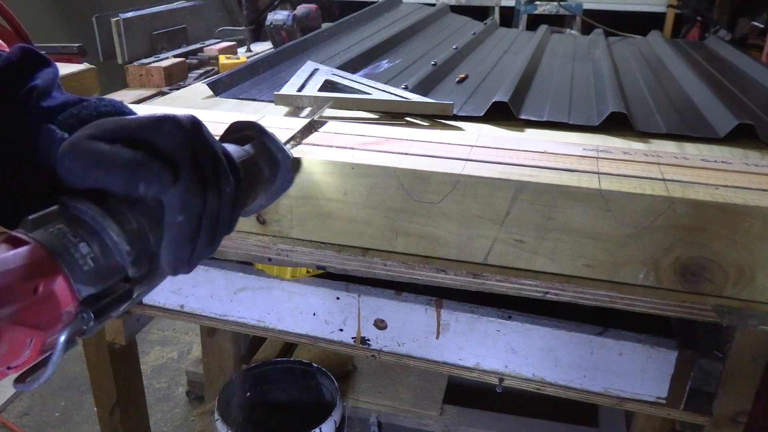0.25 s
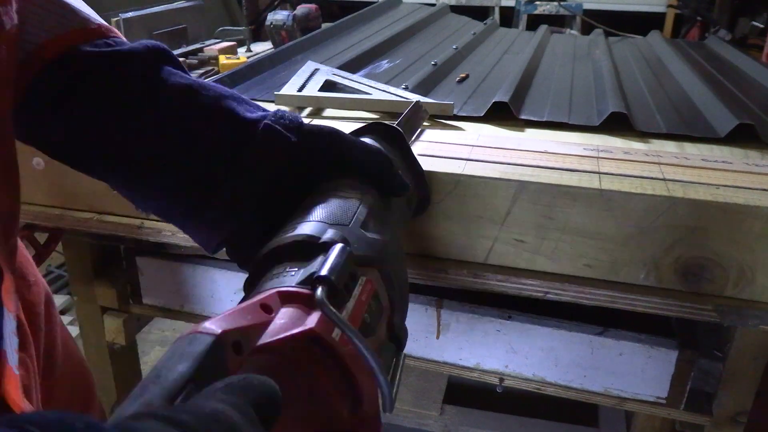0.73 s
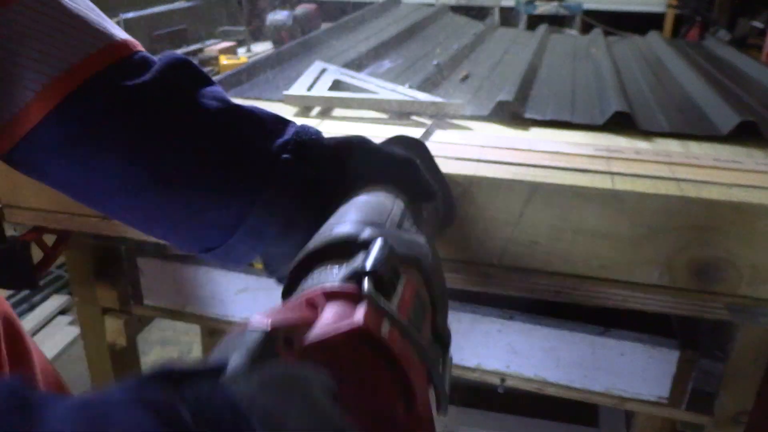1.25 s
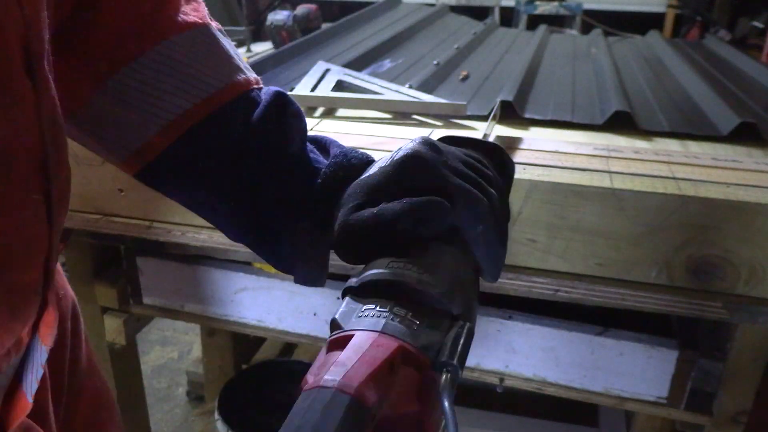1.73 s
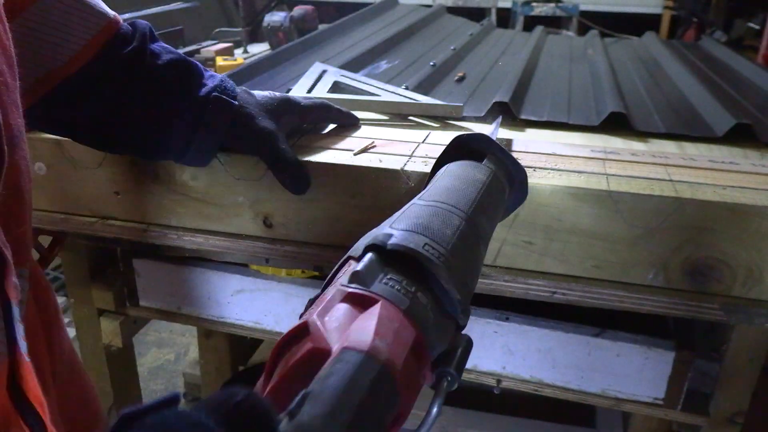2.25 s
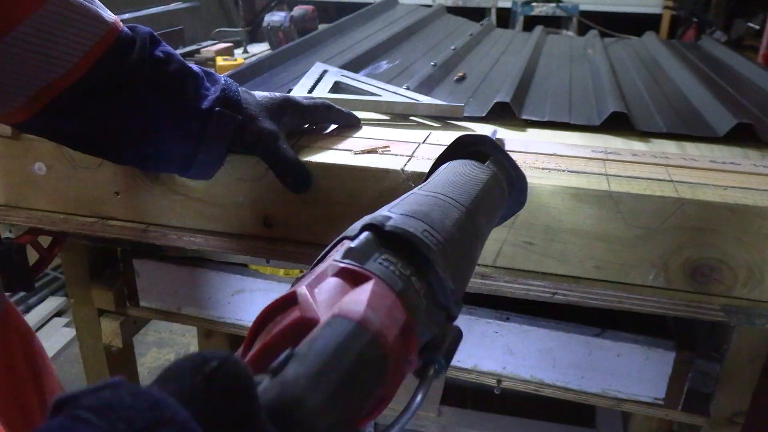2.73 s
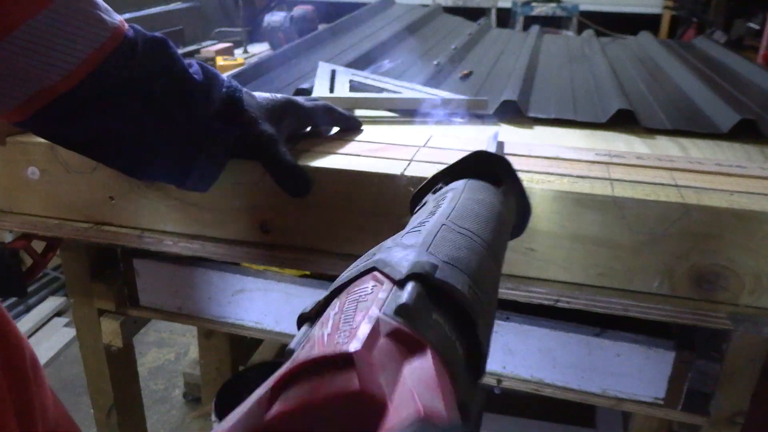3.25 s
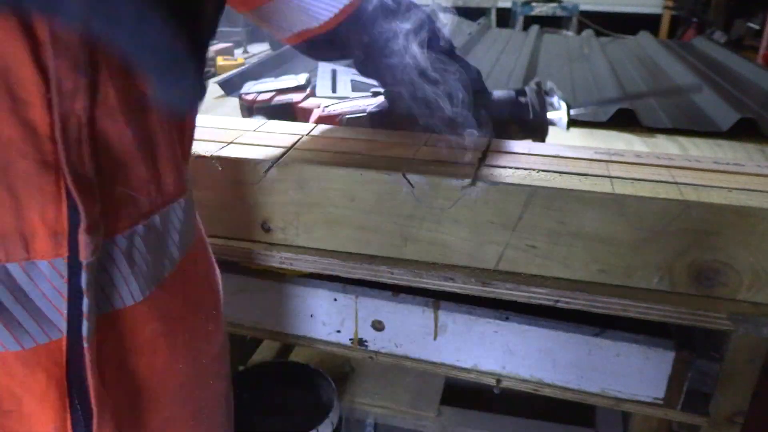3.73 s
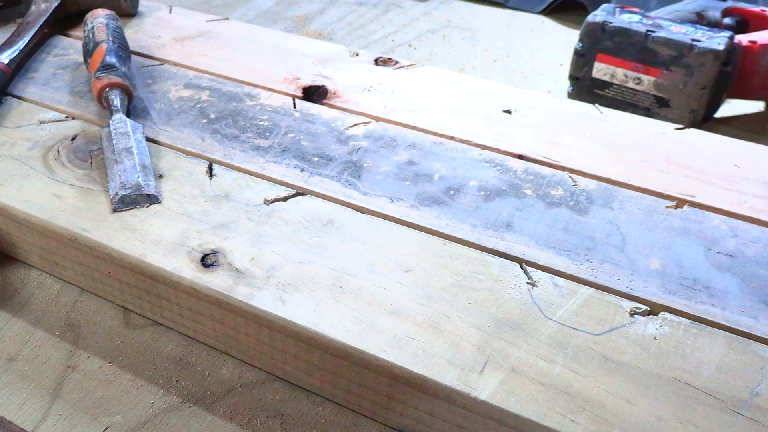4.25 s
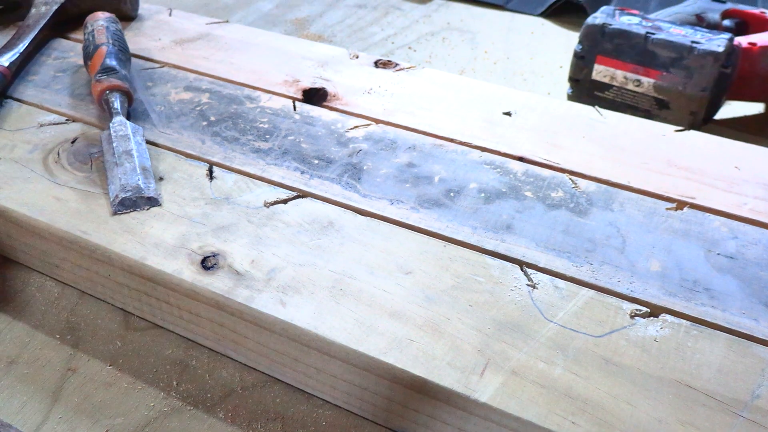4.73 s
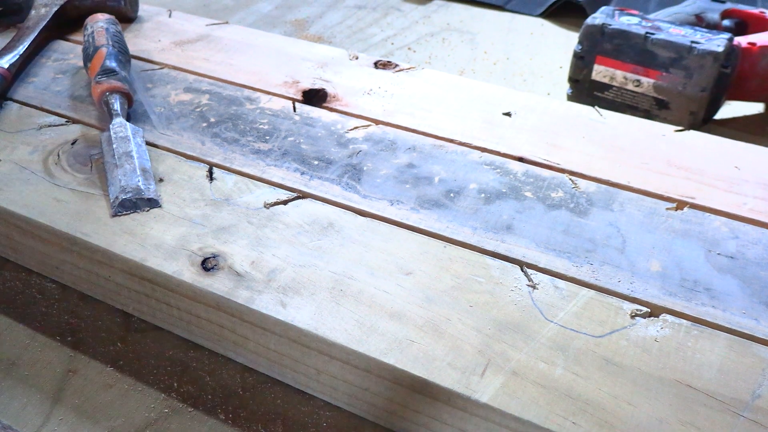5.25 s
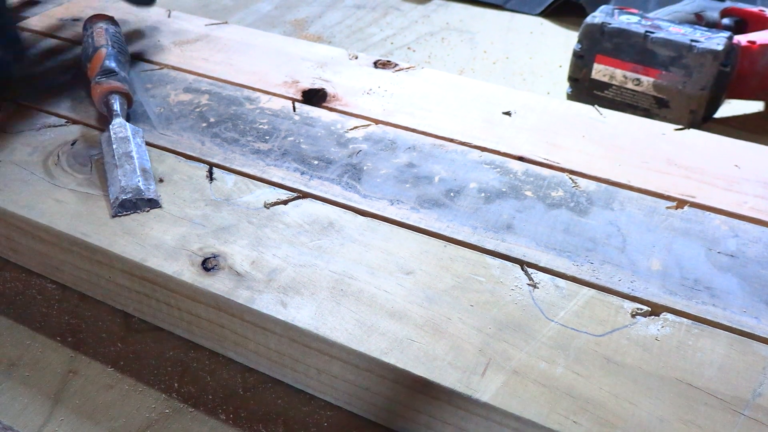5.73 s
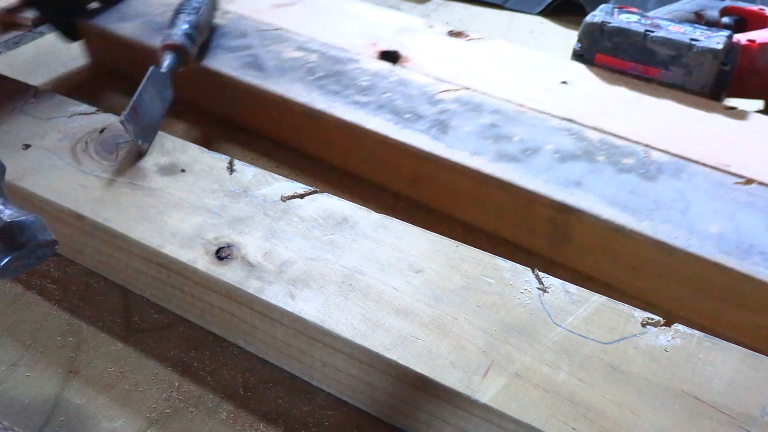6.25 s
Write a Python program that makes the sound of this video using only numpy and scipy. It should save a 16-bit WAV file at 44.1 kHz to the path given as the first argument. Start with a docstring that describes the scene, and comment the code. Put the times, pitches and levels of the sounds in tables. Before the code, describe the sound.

From 0 to 3.7 s a cordless saw works through thick timber, sped up roughly tenfold, so it is a bright, hissy, toothy buzz with a thin wavering whine. Longer pulls run about 0.1-0.6, 0.8-1.4, 2.25-2.8 and 2.9-3.7 s, sagging in pitch as the blade loads; very short zips chatter around 1.6-1.9 and 2.0-2.2. Narrow squeals colour the cut near 0.85-1.1 and 2.0, with a faint thump at 0.83. Dry taps fall at 1.5 and 1.9, and a loud double clack at 3.8. At 4.0 the speed turns natural: low, quiet air, faint rustles and tiny wooden bumps until 4.9. A gritty scrape with a small knock comes at 5.05-5.5, soft bumps around 5.7 and 6.0, then from 6.17 a rumbling timber drag with strong, dull wooden knocks at 6.18 and 6.4. Close, with a short workshop reverberation.

```python
"""First a cordless reciprocating saw cuts a timber beam, sped up about tenfold: pulses of toothy noise and
stroke hum, with a thin gear whine, narrow noisy squeals, decaying tool taps and one low thump.
The strokes sing at roughly 300-470 a second and the workshop rings briefly.
After a short silence, at natural speed, sleeves rustle and timber is dragged over the bench (grainy noise)
and knocked against it (short noisy contacts that ring the wood)."""
import sys
import numpy as np
from scipy import signal
from scipy.fft import rfft, irfft
from scipy.io import wavfile
from scipy.ndimage import uniform_filter1d

SR = 44100
rng = np.random.default_rng(int(sys.argv[2]) if len(sys.argv) > 2 else 0)


def output_pcm(signal):
    """Save a mono or channel-first signal as 16-bit PCM at the path in sys.argv[1].

    Samples are clipped to [-1, 1] before scaling.
    """
    pcm = np.clip(np.atleast_2d(signal).T, -1, 1) * 32767
    wavfile.write(sys.argv[1], SR, np.round(pcm).astype(np.int16))


N = 286650
T = np.arange(N) / SR
HZ = np.maximum(np.arange(N // 2 + 1) * SR / N, 1)
SPEED_CHANGE_S = 4.0
FREE_STROKES = 468  # strokes per second of the unloaded motor

# Pulls of the saw's trigger: (start [s], release [s], time to bite [s], rasp level [dB],
# stroke hum above rasp [dB], top hiss level at start [dB], top hiss level at release [dB])
PULLS = [(0.0, 0.077, 0.00055, -23.5, -9.5, -14.5, -24.5), (0.103, 0.588, 0.016, -24, -14.5, -17, -24.5),
         (0.626, 0.658, 0.0076, -35, -4.5, -14, -19), (0.819, 1.432, 0.0052, -21.5, -13.5, -18, -22),
         (1.604, 1.614, 0.0044, -26.5, -13, 0, -44), (1.644, 1.687, 0.0016, -17.5, -14.5, -11, -29),
         (1.735, 1.767, 0.0029, -18, -11.5, -17.5, -24), (1.824, 1.856, 0.0063, -17.5, -14.5, -8.5, -20.5),
         (1.999, 2.152, 0.0027, -20.5, -19, -16.5, -21.5), (2.184, 2.210, 0.016, -16, -10.5, 4, -29),
         (2.25, 2.833, 0.014, -25, -12, -20, -23.5), (2.876, 3.666, 0.0072, -22, -14.5, -19.5, -24.5),
         (3.68, 3.697, 0.0029, -23.5, -18.5, -10, -27)]
# Ways the timber rings: (frequency [Hz], level [dB], time to die by 60 dB [s])
TIMBER = [(200, -21, .09), (309.5, 0.5, 0.16), (505, -3.5, 0.35), (737, 3, 0.048), (906, 7.5, 0.039),
          (1182, 21.5, 0.011), (1357, 7, 0.043), (1850, 5.5, 0.032), (2850, -8, 0.016)]


def undb(db):
    """Turn decibels into gain."""
    return 10 ** (np.asarray(db) / 20)


def unit(x):
    """Scale a sound to an rms level of 1."""
    return x / np.sqrt(np.mean(x ** 2))


def colour(x, points):
    """Shape a sound's tone by (frequency [Hz], level [dB]) points."""
    hz, db = np.transpose(points)
    gain = undb(np.interp(np.log(HZ), np.log(hz), db))
    return irfft(rfft(x) * gain, N)


def band(x, low_hz, high_hz):
    """Keep the sound between two frequencies."""
    return signal.sosfilt(signal.butter(2, [low_hz, high_hz], "band", fs=SR, output="sos"), x)


def share(x, low_hz, high_hz):
    """Take a band without phase shift; neighbouring bands add up with no gap."""
    below_high = 1 / (1 + (HZ / high_hz) ** 4)
    below_low = 1 / (1 + (HZ / low_hz) ** 4)
    return irfft(rfft(x) * (below_high - below_low), N)


def ring(x, modes):
    """Let a push x set off a sum of dying tones, as in a struck solid."""
    out = 0
    for hz, db, t60 in modes:
        pole = np.exp(2j * np.pi * hz / SR - np.log(1000) / (t60 * SR))
        out = out + undb(db) * signal.lfilter([1], [1, -pole], x).imag
    return out


def walk(rate):
    """Wander at random: a new level every 1 / rate seconds, reached by a straight slide; rms 1."""
    k = int(SR / rate)
    steps = np.repeat(rng.standard_normal(N // k + 1), k)
    return unit(uniform_filter1d(steps, k)[:N])


def grit(scatter_db):
    """Make noise from grains of very uneven size, up to a largest one."""
    size_db = scatter_db * np.minimum(rng.exponential(1, N), 3)
    return unit(rng.standard_normal(N) * undb(size_db))


def room(x, t60_s, wet_db):
    """Add many blurred, dying reflections to the direct sound."""
    t = T[:int(SR * t60_s)]
    tail = rng.standard_normal(len(t)) * 1000 ** (-t / t60_s)
    return x + undb(wet_db) * signal.fftconvolve(x, tail / np.linalg.norm(tail))[:N]


def widen(mid, side_db):
    """Make two channels: short scattered reflections reach left and right with opposite sign."""
    scatter = rng.standard_normal(3000) * np.exp(-T[:3000] / .03)
    scattered = signal.fftconvolve(mid, scatter / np.linalg.norm(scatter))[:N]
    side = colour(scattered, side_db)
    return np.array([mid + side, mid - side])


def held(values):
    """Give the value of the latest trigger pull at every moment."""
    latest = np.searchsorted(np.array(PULLS)[:, 0], T) - 1
    return np.asarray(values)[np.maximum(latest, 0)]


def within(curves, column, rest):
    """Follow a column of the long cuts' curves, with a resting value outside them."""
    out = np.full(N, float(rest))
    for rows in map(np.array, curves):
        span = (T > rows[0, 0] - .02) & (T < rows[-1, 0] + .04)
        out[span] = np.interp(T[span], rows[:, 0], rows[:, column])
    return out


def motor():
    """Give trigger gain, strokes a second and evenness; the motor spins up, and its sound dies on release."""
    # The long cuts slow the motor; even strokes bring harmonics out of the rasp. One list a cut:
    # (time [s], stroke rate once spun up [per s], evenness [dB])
    stroke_curves = [
        [(.11, 450, -12), (.165, 410, -10), (.19, 446, 0), (.25, 446, 0), (.265, 422, -6), (.28, 432, -6),
         (.31, 390, -8), (.46, 363, -10), (.58, 385, -10)],
        [(.83, 470, -16), (.91, 465, -14), (.94, 446, -2), (.98, 432, -3), (1.02, 388, -7), (1.09, 397, -9),
         (1.16, 365, -5), (1.3, 306, -3), (1.33, 440, -16), (1.43, 466, -12)],
        [(2.0, 420, -14), (2.04, 420, -12), (2.055, 460, 2), (2.11, 448, 2), (2.135, 425, -10),
         (2.158, 460, -10)],
        [(2.27, 446, -10), (2.295, 464, -3), (2.35, 434, -4), (2.4, 467, -3), (2.45, 458, -4), (2.475, 432, -4),
         (2.51, 460, -4), (2.59, 456, -6), (2.71, 390, -4), (2.79, 380, -2), (2.83, 385, -4)],
        [(2.89, 396, -4), (2.94, 367, 1), (3.0, 350, -3), (3.1, 338, 0), (3.17, 321, 1), (3.21, 348, -2),
         (3.3, 336, -1), (3.5, 328, -1), (3.55, 342, -1), (3.575, 378, 0), (3.67, 370, -2)],
    ]
    spin_up_s, missing_share = .008, .3  # share of the speed missing at the start
    coast_s, free_evenness_db = .005, -13
    start, end, bite = map(held, np.transpose(PULLS)[:3])
    since = np.maximum(T - start, 0)
    attack = np.minimum(since / np.maximum(bite, 1 / SR), 1) ** 2
    on = attack * np.exp(-np.maximum(T - end, 0) / coast_s)
    spin_up = 1 - missing_share * np.exp(-since / spin_up_s)
    rate = within(stroke_curves, column=1, rest=FREE_STROKES) * spin_up
    return on, rate, within(stroke_curves, column=2, rest=free_evenness_db)


def saw():
    """Teeth rasp once a stroke; the crank hums on the stroke harmonics; both ring the tool body."""
    # Tone of the teeth: (frequency [Hz], level [dB])
    rasp_tone = [(60, -31), (600, -30), (850, -14.5), (1400, -6), (2600, -1), (5000, 1.5), (7000, 2.5),
                 (10000, 1.5), (15400, 2.5), (16500, -39.5)]
    # Tone of the crank: (frequency [Hz], level [dB])
    crank_tone = [(700, -30), (900, -4), (1050, 2), (1400, 1), (1850, 0), (2300, -1), (2700, 0), (3700, 0),
                  (4800, -12)]
    # Resonances of the tool body: (frequency [Hz], width [Hz], lift [dB])
    body = [(900, 250, 3), (1830, 250, 4), (2710, 250, 4), (3650, 350, 3), (4960, 300, 2), (9700, 1500, 2)]
    # How hard the blade is pressed into the wood, one list a long cut:
    # (time [s], rasp above that of the pull [dB])
    pressure = [
        [(0.12, 3), (0.16, 2), (0.49, 1.5), (0.585, -2.5)],
        [(0.825, 2.5), (0.91, -1), (0.95, -2.5), (1.15, -0.5), (1.36, 4.5), (1.43, -2.5)],
        [(2.0, 0.5), (2.04, -2.5), (2.1, 0.5), (2.125, 0.5), (2.158, 6)],
        [(2.265, 2.5), (2.33, 0), (2.4, -5), (2.48, 0.5), (2.55, -2.5), (2.8, 4.5), (2.835, 2)],
        [(2.885, 0), (2.92, 5), (2.95, -1.5), (3.36, -1), (3.4, -2), (3.6, -5), (3.668, -2.5)],
    ]
    hum_top_hz, hiss_from_hz = 2200, 7000

    start, end, _, rasp_db, hum_db, first_db, last_db = map(held, np.transpose(PULLS))
    rasp_db = rasp_db + within(pressure, column=1, rest=0)
    progress = np.clip((T - start) / (end - start), 0, 1)
    hiss_db = first_db + (last_db - first_db) * progress - rasp_db  # relative to the rasp
    on, rate, even_db = motor()
    phase = 2 * np.pi * np.cumsum(rate * (1 + .006 * walk(70))) / SR

    turns = rng.uniform(0, 2 * np.pi, 12)
    crank = 0
    for k in range(12):  # stroke harmonics 2 to 13, each coming and going
        crank = crank + undb(3.5 * walk(55)) * np.cos((k + 2) * phase + turns[k])
    # The cutting stroke is louder than the return
    teeth = grit(1.2) * (1 + .3 * np.cos(phase) + .2 * np.cos(2 * phase))

    lift = 1
    for f, width, db in body:
        lift = lift + (undb(db) - 1) / (1 + (2 * (HZ - f) / width) ** 2)
    teeth = irfft(rfft(unit(colour(teeth, rasp_tone))) * lift, N)
    crank = irfft(rfft(unit(colour(crank, crank_tone))) * lift, N)

    even = undb(even_db)
    low_teeth = unit(share(teeth, 60, hum_top_hz))
    low_crank = unit(share(crank, 60, hum_top_hz))
    hum = unit(low_teeth + 1.4 * even * low_crank)
    mid_teeth = unit(share(teeth, hum_top_hz, hiss_from_hz))
    mid_crank = unit(share(crank, hum_top_hz, hiss_from_hz))
    rasp = unit(mid_teeth + .55 * even * mid_crank)
    hiss = unit(share(teeth, hiss_from_hz, 20000))

    layers = hum * undb(hum_db + 2.2 * walk(40))
    layers = layers + rasp * undb(1.2 * walk(40))
    layers = layers + hiss * undb(hiss_db + 1.5 * walk(40))
    return on * undb(rasp_db + 0.67 * walk(40)) * layers


def whine():
    """A thin wavering gear tone follows the strokes, clearest when they are fast and even."""
    whine_db, fade_db_per_stroke = -20.5, .15  # level before evenness and speed count; fade as the motor slows
    gear_ratio = 22.2  # whine cycles a stroke
    on, rate, even_db = motor()
    phase = 2 * np.pi * np.cumsum(gear_ratio * rate * (1 + .003 * walk(80))) / SR
    db = whine_db + .5 * even_db - fade_db_per_stroke * (FREE_STROKES - rate)
    return on * undb(db + 3.0 * walk(40)) * np.cos(phase)


def fast_air():
    """Steady grainy background noise, its level wandering, lies under the fast part."""
    # Tone of this background: (frequency [Hz], level [dB])
    fast_air_tone = [(300, -24.5), (800, -3.5), (1500, 0.5), (5000, -4.5), (9000, -12), (16000, -29.5)]
    return undb(-60 + 2.0 * walk(21)) * unit(colour(grit(2.1), fast_air_tone))


def taps():
    """Shoe and tool tap the bench between cuts: a short rattle rings the tool, with a dry crack on top."""
    # Taps: (time [s], level [dB], treble above that level [dB])
    tap_list = [(0.744, -34, -17), (0.78, -39, 9), (1.494, -25.5, 0), (1.502, -22, -1.5), (1.526, -31, -6),
                (1.563, -38.5, 9), (1.919, -19.5, -2.5), (1.946, -18, -10), (1.966, -38, 7),
                (3.755, -30.5, 5), (3.823, 8.5, -18), (3.845, 5.5, -11.5), (3.962, -34, 4),
                (3.993, -44.5, 18.5)]
    # Ways the tool rings: (frequency [Hz], level [dB], time to die by 60 dB before the hand damps it [s])
    tap_modes = [(1730, 2.5, 0.013), (2900, 9, 0.038), (3780, 6, 0.034), (4760, -27, 0.074),
                 (5460, -4.5, 0.039), (7250, -30, 0.14), (8440, -41, 0.13), (9300, -35.5, 0.014)]
    length = 4000
    out, t = np.zeros(N), T[:length]
    for s, db, treble_db in tap_list:
        noise = rng.standard_normal((3, length))
        rattle = noise[0] * np.exp(-t / .003)
        tone = band(ring(rattle, tap_modes), 900, 12000)
        tone = tone * np.exp(-t / .007)  # the hand damps the ring
        crack = 0.58 * band(noise[1], 1870, 4350) + undb(treble_db) * band(noise[2], 2900, 11000)
        tap = .5 * tone / abs(tone).max() + 0.92 * crack * np.exp(-t / 0.0074)
        i = int(s * SR)
        out[i:i + length] += undb(db) * tap * np.minimum(t / 0.0024, 1)  # soft start
    return out


def jolt():
    """A low, dull, quickly dying noise thumps as the blade bites into the beam."""
    start_s, level_db, decay_s = .835, -41, .022
    fade = (T > start_s) * np.exp(-np.maximum(T - start_s, 0) / decay_s)
    return undb(level_db) * fade * unit(band(rng.standard_normal(N), 70, 600))


def squeals():
    """Narrow bands of noise come in throbbing puffs, the highest from the motor's gears."""
    # Saw squeals: (start [s], end [s], frequency [Hz], width [Hz], level [dB], throb rate [per s])
    squeal_list = [(0.836, 0.918, 3630, 398, -16.5, 183), (0.972, 1.005, 9400, 600, -14.5, 890),
                   (1.004, 1.056, 8870, 405, -12.5, 660), (1.067, 1.106, 8840, 300, -15.5, 700),
                   (2, 2.058, 4910, 500, -18.5, 1400)]
    out = 0
    for start, end, hz, width, db, rate in squeal_list:
        on = uniform_filter1d(1. * (T > start) * (T < end), size=200)
        throb = unit(np.exp(1.2 * np.cos(2 * np.pi * rate * T)))
        tone = unit(band(rng.standard_normal(N), hz - width / 2, hz + width / 2))
        out = out + undb(db + 1.1 * walk(49.94)) * on * throb * tone
    return out


def slow_air():
    """Steady background noise lies under the natural-speed part."""
    # Tone of this background: (frequency [Hz], level [dB])
    air_tone = [(18, -50.5), (30, -47), (97, 1.5), (337, -15.5), (581, -4), (1340, -10), (5730, -20),
                (11600, -25.5), (15000, -37)]
    return undb(-56) * unit(colour(rng.standard_normal(N), air_tone))


def slides():
    """Give gains of scrape, rustle and rumble: each slide rises, sags (or swells) while held, and falls."""
    # Slides: (start [s], rise [s], hold [s], fall [s], sag while held [dB; negative swells],
    # scrape level [dB], sleeve and grit rustle level [dB], timber rumble level [dB])
    slide_list = [(4.212, 0.04, 0.006, 0.035, 4, -55, -53.5, -53.5),
                  (4.288, 0.016, 0.0045, .04, 4, -60, -53, -62),
                  (4.472, 0.033, .005, .04, 3, -67, -55.5, -63.5),
                  (4.527, 0.062, .02, 0.11, 3, -61, -46.5, -55),
                  (4.624, 0.044, 0.071, 0.049, 4, -50, -48.5, -56),
                  (4.84, 0.11, 0.067, 0.041, 2.5, -53, -57, -51),
                  (5.038, 0.032, 0.39, 0.048, 12, -23, -31, -39),
                  (5.508, 0.035, 0.17, 0.056, -7, -54, -59, -47.5),
                  (5.68, 0.05, 0.028, 0.35, 6, -52, -46, -39.5),
                  (5.84, 0.089, 0.084, 0.3, 1.5, -56, -49, -53.5),
                  (6.104, 0.048, .02, .04, 0, -49.5, -50, -49),
                  (6.174, 0.071, 0.18, 0.1, 0.5, -33, -43, -27.5),
                  (6.4, 0.042, .01, 0.051, 11, -50, -55, -17.5)]
    # Levels between slides: (scrape [dB], rustle [dB], rumble [dB])
    rest_db = (-78, -79.5, -62.5)
    edge_db = 25  # how far the rise climbs and the fall drops; quick fades lie beyond
    rumble_sag_share = 0.43  # the rumble sags by only this share of the scrape's sag
    power = undb(rest_db)[:, None] ** 2
    for start, rise, hold, fall, sag_db, *peak_db in slide_list:
        times = np.cumsum([start - .01, .01, rise, hold, fall, fall])
        shape_db = np.interp(T, times, [-99, -edge_db, 0, -sag_db, -sag_db - edge_db, -99])
        hold_progress = np.clip((T - start - rise) / hold, 0, 1)
        kept_db = (1 - rumble_sag_share) * sag_db * np.outer([0, 0, 1], hold_progress)  # rumble only
        power = power + undb(shape_db + kept_db + np.array(peak_db)[:, None]) ** 2
    return np.sqrt(power)


def drag():
    """Grainy sliding contact makes a scrape, a rustle and a rumble in the timber, all slipping unevenly."""
    # Tone of the rubbing: (frequency [Hz], level [dB])
    scrape_tone = [(240, -32), (400, -12.5), (1140, -3.5), (1490, 3.5), (1790, 2.5), (2600, -2), (3810, -7),
                   (7000, -15.5), (11600, -28), (14600, -41), (16000, -70)]
    # Tone of the timber's rumble: (frequency [Hz], level [dB])
    rumble_tone = [(24, -61.5), (40, -40), (86, -4.5), (142, -20.5), (212, 5), (352, -6), (514, -0.5),
                   (900, -18.5), (1170, -5), (1980, -120)]
    scrape_gain, rustle_gain, rumble_gain = slides()
    slips_db = 1.3 * walk(70)
    rub = colour(grit(3), scrape_tone)
    scrape = share(unit(rub) + .45 * unit(ring(rub, TIMBER)), 600, 3000)
    rustle = share(rub, 3000, 16000)
    rumble = colour(grit(1.4), rumble_tone)
    bright = unit(scrape) * scrape_gain + unit(rustle) * rustle_gain * undb(2.0 * walk(60))
    return bright * undb(slips_db) + unit(rumble) * rumble_gain * undb(3.6 * walk(30))


def knocks():
    """Rattling contacts thud and ring the timber, a little off each time; dull ones favour low modes."""
    # Timber knocks: (time [s], level [dB], contact brightness [Hz], rattle decay time [s],
    # crack above that level [dB])
    knock_list = [(4.567, -43.5, 568, 0.0074, -30), (4.654, -37.5, 576, 0.0038, -30),
                  (4.682, -32.5, 616, 0.011, -33), (4.708, -32.5, 2990, 0.006, -18),
                  (4.964, -39.5, 533, 0.009, -25), (5.077, -23.5, 1100, .006, -22),
                  (5.44, -39, 170, 0.019, -41), (5.695, -29, 530, 0.022, -14),
                  (5.739, -22, 417, 0.017, -19), (5.989, -35.5, 230, 0.019, -16),
                  (6.014, -32.5, 210, 0.011, -12), (6.179, -8, 1160, 0.0046, -42),
                  (6.19, -9, 1100, 0.011, -33), (6.386, -8.5, 1230, 0.012, -18),
                  (6.403, -11.5, 497, 0.011, -17.5), (6.434, -12, 1100, 0.0084, -23)]
    length = 9000
    out, t = np.zeros(N + length), T[:length]
    for s, db, hz, rattle_s, crack_db in knock_list:
        noise = rng.standard_normal(length)
        rattle = noise * np.exp(-t / rattle_s)
        push = band(rattle, .5 * hz, 1.48 * hz)
        modes = [(f * (1 + 0.035 * rng.standard_normal()), g, t60) for f, g, t60 in TIMBER]
        tone = ring(push, modes)
        thud = band(band(rattle, hz / 2.5, 1.8 * hz), 110, 3.0 * hz)
        crack = band(noise[::-1], 1800, 7600) * np.exp(-t / 0.028)
        knock = tone / abs(tone).max() + 1.1 * thud / abs(thud).max() + undb(crack_db) * crack
        i = int(s * SR)
        out[i:i + length] += undb(db) * knock
    return out[:N]


def scene():
    """Play the fast part, a short silence, then the part at natural speed."""
    # Width of the fast part: (frequency [Hz], side above mid [dB])
    fast_side = [(60, -17), (110, -16), (200, -17), (380, -17), (700, -27), (1290, -31), (2380, -34),
                 (4400, -24), (8120, -11), (15000, -9)]
    # Width of the natural part: (frequency [Hz], side above mid [dB])
    slow_side = [(60, -26), (110, -28), (200, -25), (380, -18), (700, -10), (1290, -8), (2380, -6),
                 (4400, -5), (8120, -4), (15000, -8)]
    fast = room(saw() + whine() + taps() + jolt() + squeals(), 0.071, -9)
    fast = colour(fast, [(350, -7.5), (800, -4.0)])  # the microphone's bass roll-off is lifted tenfold too
    fast = fast + fast_air()
    slow = room(drag() + knocks(), 0.36, -9.0) + slow_air()
    fast_part = widen(fast, fast_side) * (T < SPEED_CHANGE_S)
    slow_part = widen(slow, slow_side) * (T > SPEED_CHANGE_S + .011)
    return fast_part + slow_part


def record(dry):
    """The recorder rounds the loudest peaks and cuts the treble above 15900 Hz."""
    rounded = 1.25 * np.tanh(dry / 1.25)
    return signal.sosfilt(signal.ellip(10, .2, 70, 15900, fs=SR, output="sos"), rounded)


dry = scene()
out = record(dry)
output_pcm(out)
```